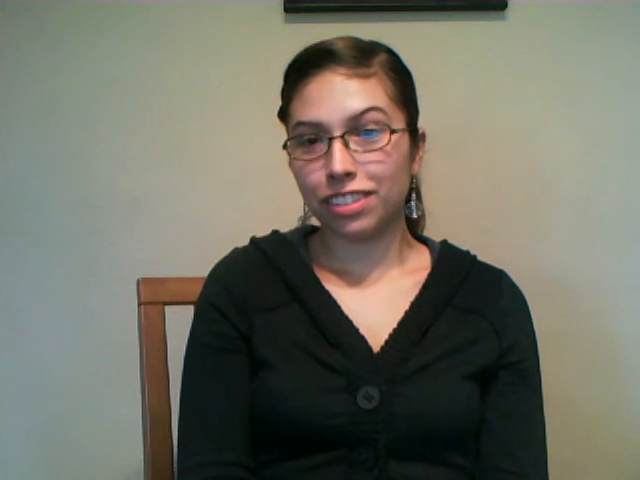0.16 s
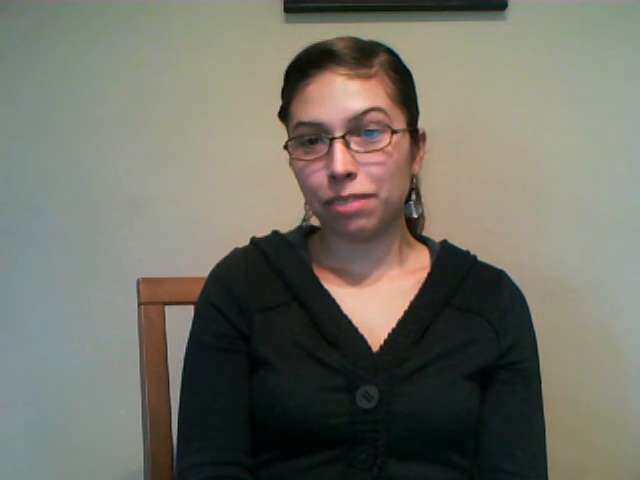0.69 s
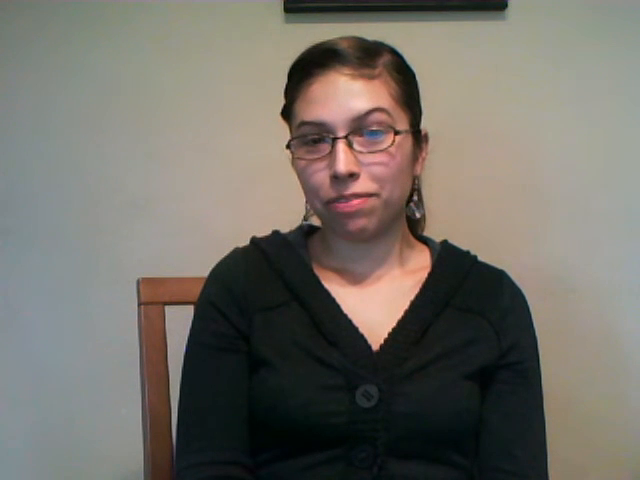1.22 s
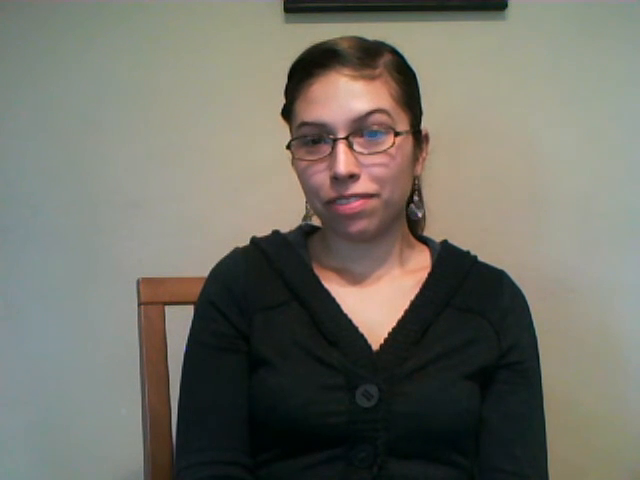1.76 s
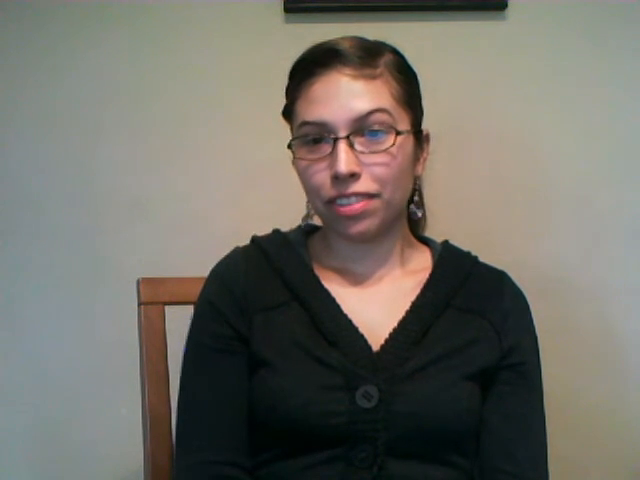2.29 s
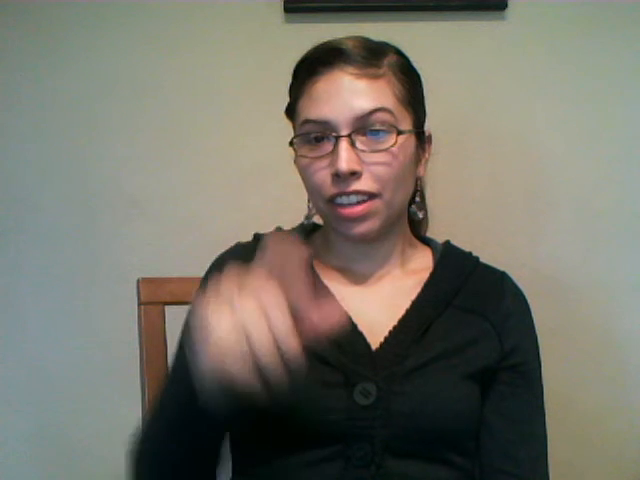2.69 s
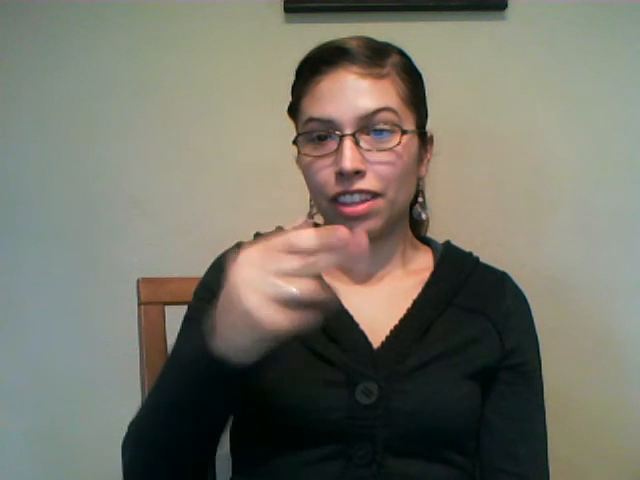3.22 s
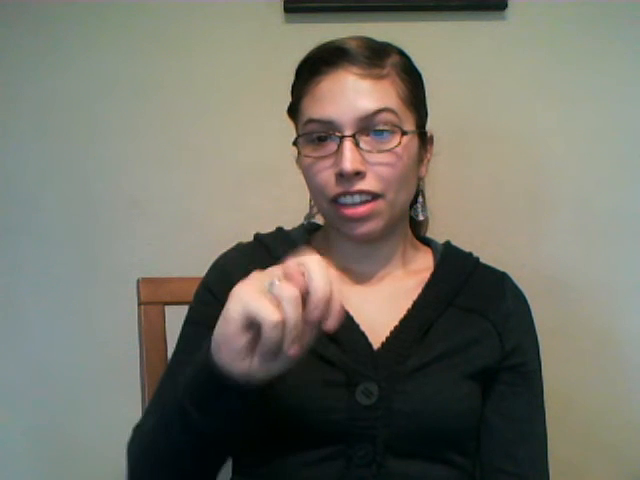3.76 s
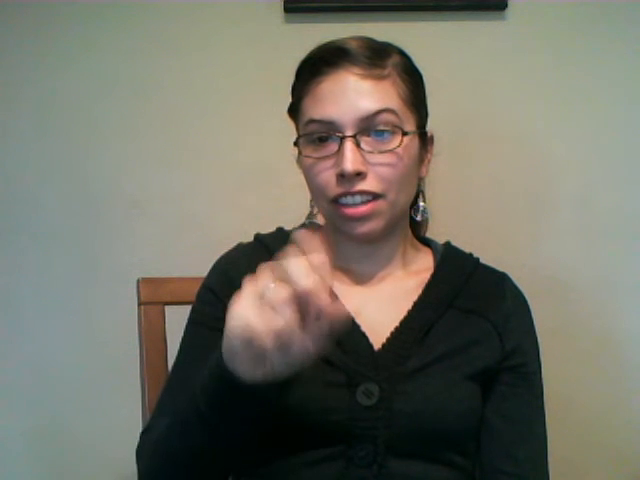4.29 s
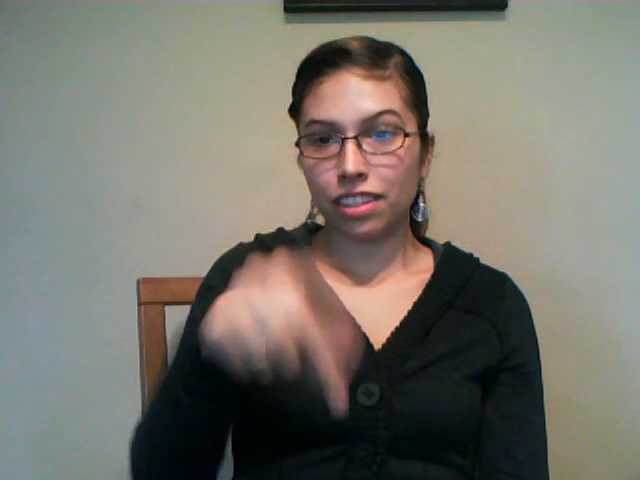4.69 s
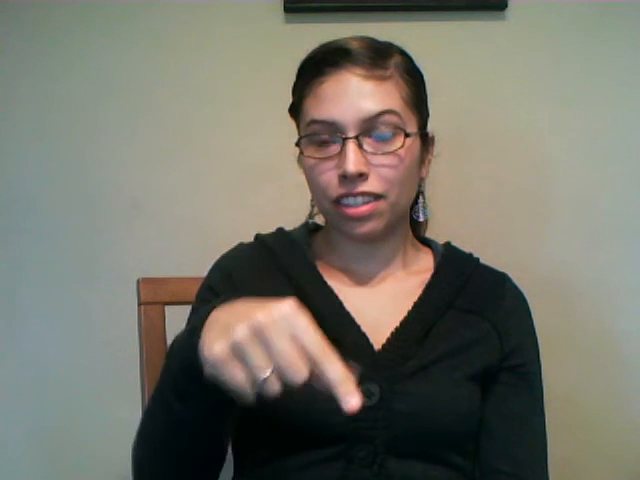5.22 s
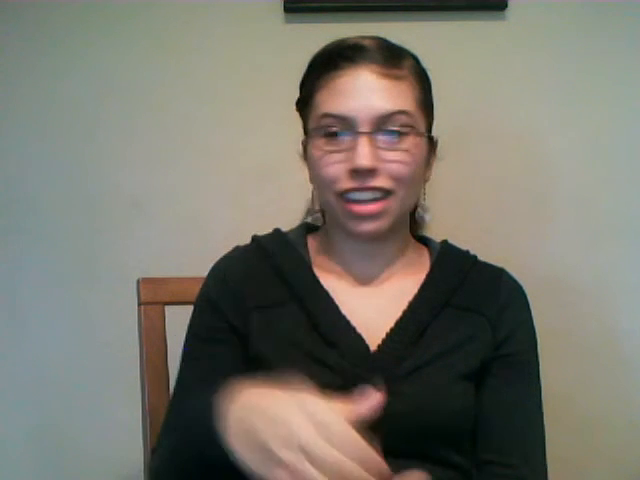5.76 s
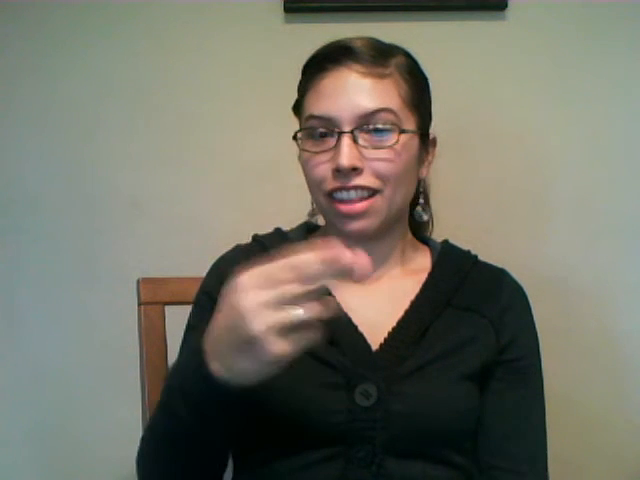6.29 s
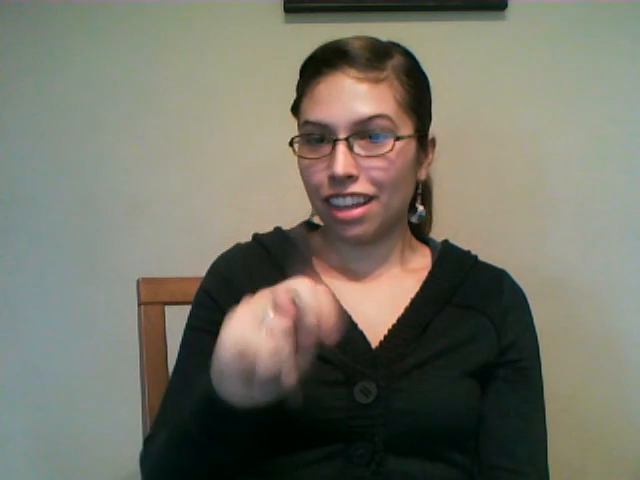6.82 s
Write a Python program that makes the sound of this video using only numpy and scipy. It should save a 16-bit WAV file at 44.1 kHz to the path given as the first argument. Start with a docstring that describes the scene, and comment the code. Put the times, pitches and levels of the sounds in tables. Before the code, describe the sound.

Quiet room filled by constant computer fan drone, mains hum and hiss; a seated person's arm movements add very faint rustles, bumps and a tap.

```python
"""Computer in a quiet room, through a webcam microphone

Steady sines make the mains hum, which beats slowly against a hard disk's spindle with a thin motor buzz.
Three fans whirr as shaft harmonics that waver in pitch and level, over coloured noise for air, rumble and hiss.
Camera data bursts leak in as a thin tone, gated on and off. A seated person moves an arm: a few very faint
rustles, bumps and squeaks, a tick and one light tap, made of enveloped noise bands and a wavering sine."""
import sys
import numpy as np
from scipy.fft import rfft, irfft, next_fast_len
from scipy.io import wavfile
from scipy.ndimage import map_coordinates

SR = 44100
rng = np.random.default_rng(int(sys.argv[2]) if len(sys.argv) > 2 else 0)


def materialize(psi):
    """Save the field psi as 16-bit PCM at rate SR to the path in sys.argv[1].

    A 1-D psi becomes a single channel; in a 2-D psi each row is a channel.
    """
    bounded = np.clip(np.atleast_2d(psi).T, -1, 1)
    quanta = np.round(bounded * 32767).astype(np.int16)
    wavfile.write(sys.argv[1], SR, quanta)


N = 311963


def amp(db):
    """Decibels to gain."""
    return 10 ** (np.asarray(db) / 20)


def unit(x):
    """Scale to rms 1."""
    return x / np.sqrt(np.mean(x ** 2) + 1e-20)


def clock():
    """Time of each sample, in seconds."""
    return np.arange(N) / SR


def wobble(rate_hz):
    """Smooth random curve through rate_hz normal random knots a second."""
    knots = rng.standard_normal(int(N * rate_hz / SR) + 4)
    return map_coordinates(knots, [clock() * rate_hz])


def filtered(x, response):
    """Multiply the spectrum of x by a response of frequency."""
    size = next_fast_len(N + 8192)
    spectrum = rfft(x, size) * response(np.fft.rfftfreq(size, 1 / SR))
    return irfft(spectrum, size)[:N]


def noise(spectrum):
    """Noise of rms 1, coloured by (freq_hz, relative level_db) points on a log axis."""
    freq_hz, level_db = np.transpose(spectrum)

    def colour(hz):
        return amp(np.interp(np.log(hz + 1), np.log(freq_hz), level_db))

    return unit(filtered(rng.standard_normal(N), colour))


def band(centre_hz, width_hz):
    """Noise of rms 1 in one resonance; its amplitude response halves width_hz off centre."""
    return unit(filtered(rng.standard_normal(N), lambda hz: 1 / (1 + ((hz - centre_hz) / width_hz) ** 2)))


def tone(cycles):
    """Sine of rms 1 from a running cycle count, random start phase."""
    return np.sqrt(2) * np.sin(2 * np.pi * (cycles + rng.random()))


def swell(peak_s, sigma_s):
    """Gaussian rise and fall, peak 1."""
    return np.exp(-.5 * ((clock() - peak_s) / sigma_s) ** 2)


# Mains hum: harmonic, level_db (rms)
MAINS_HARMONICS = [(1, -32.0), (2, -51.9), (3, -55.7), (4, -66.4), (5, -61.5), (6, -64.3), (7, -68.0),
                   (9, -68.8)]
MAINS_HZ = 60.01


def mains():
    """Steady electrical hum: harmonics of the mains rate."""
    return sum(amp(level_db) * tone(harmonic * MAINS_HZ * clock()) for harmonic, level_db in MAINS_HARMONICS)


# Thin buzz of the disk motor: harmonic, level_db (relative)
DISK_BUZZ = [(9, -76), (10, -76), (14, -80), (15, -80), (17, -81), (27, -78), (28, -82)]
SPINDLE_HZ, BUZZ_HZ = 121.21, 228.215


def disk(spindle_db, buzz_gain_db):
    """The spindle turns just above twice the mains rate, so the hum slowly rolls; the motor buzzes."""
    spindle = amp(spindle_db) * tone(SPINDLE_HZ * clock())
    buzz = sum(amp(level_db) * tone(harmonic * BUZZ_HZ * clock()) for harmonic, level_db in DISK_BUZZ)
    return spindle + amp(buzz_gain_db) * buzz


def fan(shaft_hz, orders, drift, flutter_db):
    """Blade and motor tones on one slightly unsteady shaft; turbulence shakes each tone."""
    turns = np.cumsum(shaft_hz * (1 + drift * wobble(1.98))) / SR
    return sum(amp(level_db + flutter_db * wobble(5)) * tone(round(order) * turns)
               for order, level_db in orders)


# Tones of each fan: shaft_order, level_db (rms, before flutter)
SLOW_FAN_ORDERS = [(4, -58.9), (8, -55.9), (13, -68.5), (16, -64.7), (20, -56.8), (24, -65.3), (25, -65.8),
                   (36, -72.7)]
MIDDLE_FAN_ORDERS = [(1, -48.0), (4, -56.9), (8, -64.4), (12, -68.5), (13, -58.3), (16, -63.9), (20, -57.7),
                     (24, -63.5), (26, -65.5)]
FAST_FAN_ORDERS = [(1, -49), (3, -68), (4, -61), (6, -64.5), (12, -74)]
SLOW_HZ, MIDDLE_HZ, FAST_HZ = 43.476, 50.745, 53.725  # mean shaft rates


def fans():
    """Three fans, each with its own shaft rate and tones."""
    shafts = [(SLOW_HZ, SLOW_FAN_ORDERS), (MIDDLE_HZ, MIDDLE_FAN_ORDERS), (FAST_HZ, FAST_FAN_ORDERS)]
    return sum(fan(shaft_hz, orders, drift=0.00019, flutter_db=1.0) for shaft_hz, orders in shafts)


# Air through fans and case: freq_hz, level_db (per Hz, relative)
AIR_SPECTRUM = [(100, -1.5), (140, -1), (195, 0.5), (260, -5), (330, -1.5), (420, -5), (590, -5), (690, 0),
                (780, -2.5), (900, -1), (1400, -10), (1850, -11.5), (2800, -22.5), (6000, -35.5)]


def air(level_db, flutter_db):
    """Rush of air as coloured noise; the flow is never quite even."""
    return amp(level_db + flutter_db * wobble(8)) * noise(AIR_SPECTRUM)


def computer():
    """Fans, their rush of air, and the disk."""
    return fans() + air(level_db=-45.5, flutter_db=.25) + disk(spindle_db=-33.5, buzz_gain_db=0.5)


# Arm strokes brushing the sleeve: peak_s, level_db (rms at peak), sigma_s
SLEEVE_STROKES = [(3.656, -45.5, .018), (4.41, -49, 0.042), (4.547, -46.5, 0.041), (5.099, -45, .0093),
                  (6.372, -49.5, 0.034), (6.5, -43.5, 0.029)]


def rustles(centre_hz, width_hz):
    """Cloth brushes in soft puffs of one noise colour."""
    strokes = sum(amp(level_db) * swell(peak_s, sigma_s) for peak_s, level_db, sigma_s in SLEEVE_STROKES)
    return strokes * band(centre_hz, width_hz)


# Faint thin squeaks: peak_s, level_db (rms at peak), sigma_s
SQUEAK_EVENTS = [(3.665, -57.5, .075), (4.612, -58.5, .045)]


def squeaks(pitch_hz, waver_hz):
    """Gaussian swells of one tone with a randomly wavering pitch."""
    thin = tone(np.cumsum(pitch_hz + waver_hz * wobble(30)) / SR)
    swells = sum(amp(level_db) * swell(peak_s, sigma_s) for peak_s, level_db, sigma_s in SQUEAK_EVENTS)
    return swells * thin


# Dull bumps of the arm: peak_s, level_db (rms at peak)
ARM_BUMPS = [(4.565, -43), (6.5, -40.5)]


def bumps(centre_hz, width_hz, sigma_s):
    """Short swells of noise in one low resonance."""
    swells = sum(amp(level_db) * swell(peak_s, sigma_s) for peak_s, level_db in ARM_BUMPS)
    return swells * band(centre_hz, width_hz)


# Resonances of the light tap: freq_hz, level_db (rms before the envelope)
TAP_RESONANCES = [(620, -46), (1110, -42.5), (1450, -50), (1700, -50), (3000, -61)]


def tap(start_s, attack_s, t60_s, width_hz):
    """Light touch of the hand: a quick rise, then a few resonances fade in the room."""
    age_s = np.maximum(clock() - start_s, 0)
    ring = sum(amp(level_db) * band(freq_hz, width_hz) for freq_hz, level_db in TAP_RESONANCES)
    rise = 1 - np.exp(-age_s / attack_s)  # zero before start_s
    return ring * rise * amp(-60 * age_s / t60_s)


def tick(peak_s, level_db, centre_hz, width_hz, sigma_s):
    """One tiny, brighter tick: a swell of narrow-band noise."""
    return amp(level_db) * swell(peak_s, sigma_s) * band(centre_hz, width_hz)


def person():
    """Arm movement, one tap and one tick."""
    arm = rustles(centre_hz=950, width_hz=140) + squeaks(pitch_hz=1964, waver_hz=9.1)
    arm += bumps(centre_hz=180, width_hz=26, sigma_s=0.019)
    touch = tap(start_s=5.501, attack_s=.003, t60_s=0.35, width_hz=100)
    return arm + touch + tick(peak_s=5.177, level_db=-56, centre_hz=2600, width_hz=390, sigma_s=.013)


FIRST_BURST_S, FRAME_S, BURST_S, PACKET_HZ = .0113, .132872, .0307, 8000


def data_whine(level_db):
    """Each picture is sent as a burst of packets, whose rate leaks into the microphone circuit."""
    sending = (clock() - FIRST_BURST_S) % FRAME_S < BURST_S
    return amp(level_db) * sending * tone(PACKET_HZ * clock())


# Building rumble: freq_hz, level_db (per Hz, relative)
RUMBLE_SPECTRUM = [(4, -12), (14, -1), (25, 1.5), (40, -8), (65, -12), (100, -24), (200, -53.5)]


def rumble(level_db):
    """Low building rumble as steady coloured noise."""
    return amp(level_db) * noise(RUMBLE_SPECTRUM)


# Preamplifier hiss: freq_hz, level_db (per Hz, relative)
HISS_SPECTRUM = [(100, 0.5), (3000, 0), (5000, -1.6), (9000, -4.5), (15500, -7)]


def hiss(level_db):
    """Preamplifier hiss as steady noise, falling gently in the treble."""
    return amp(level_db) * noise(HISS_SPECTRUM)


def scene():
    """Room sounds plus the microphone's electrical noise, mono."""
    room = computer() + person() + rumble(level_db=-44.5)
    electrical = mains() + data_whine(level_db=-49.0) + hiss(level_db=-54.0)
    return (room + electrical)[None]


TOP_HZ = 15780


def record(dry):
    """Band limit: nothing is kept from TOP_HZ up."""
    return filtered(dry[0], lambda hz: hz < TOP_HZ)[None]


dry = scene()
out = record(dry)
materialize(out)
```